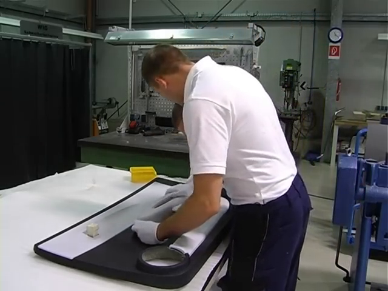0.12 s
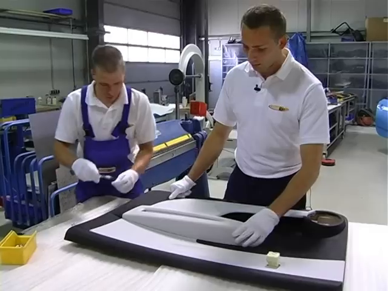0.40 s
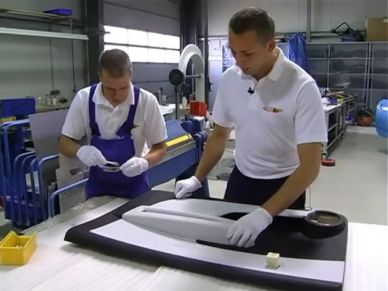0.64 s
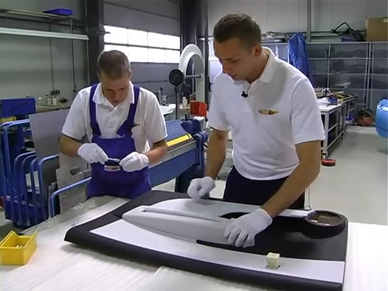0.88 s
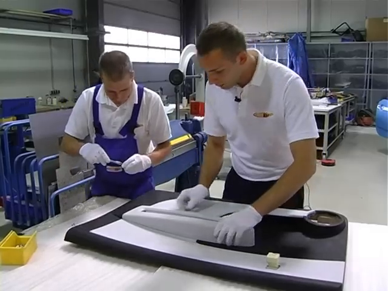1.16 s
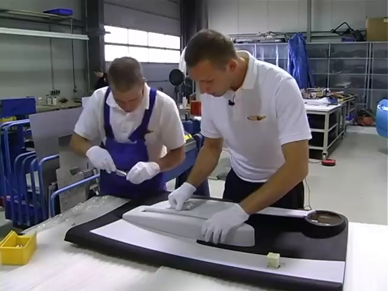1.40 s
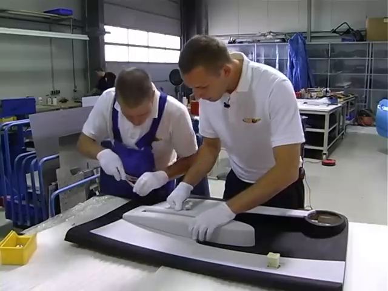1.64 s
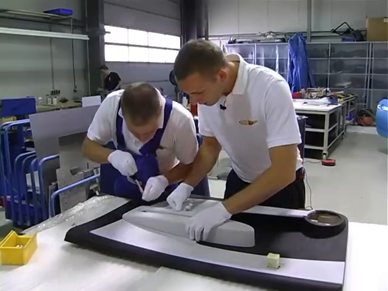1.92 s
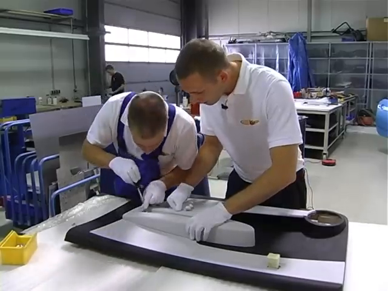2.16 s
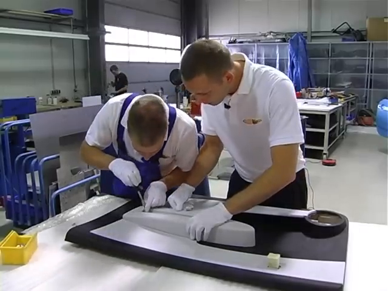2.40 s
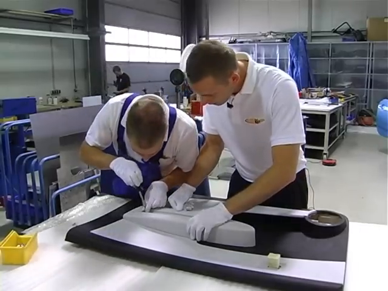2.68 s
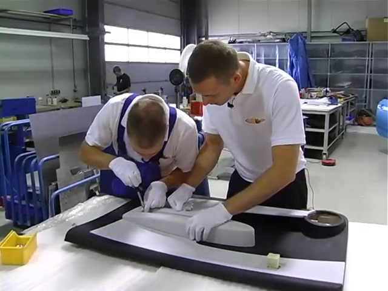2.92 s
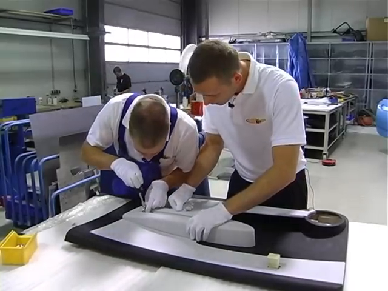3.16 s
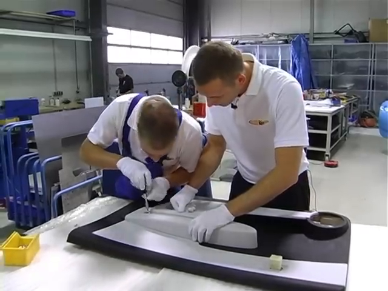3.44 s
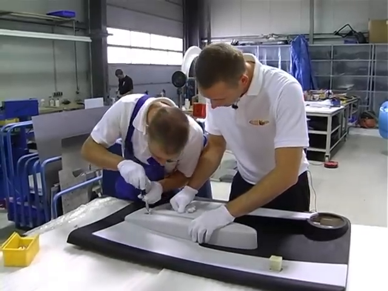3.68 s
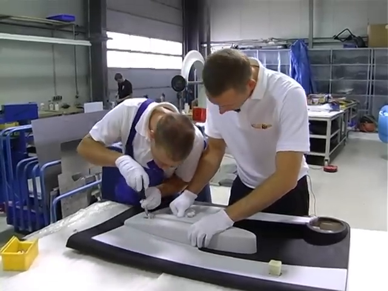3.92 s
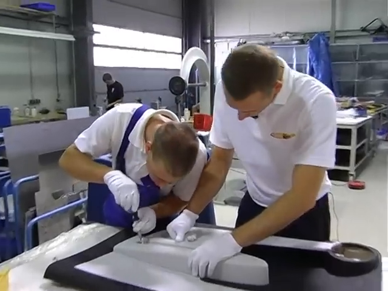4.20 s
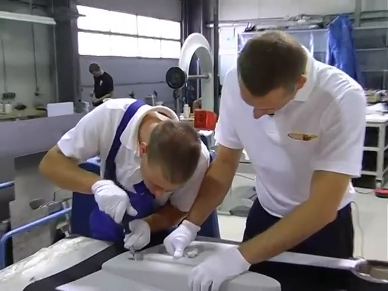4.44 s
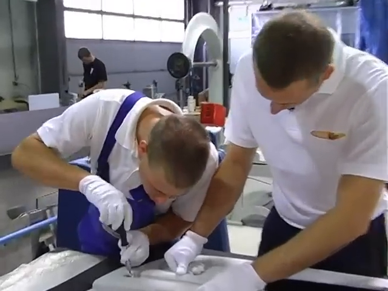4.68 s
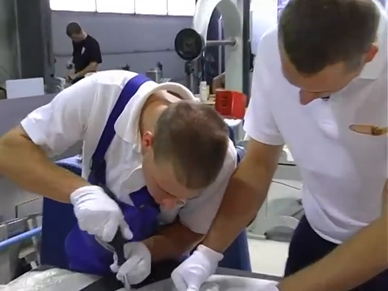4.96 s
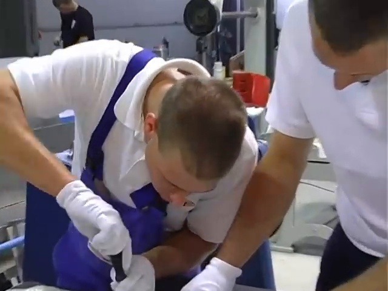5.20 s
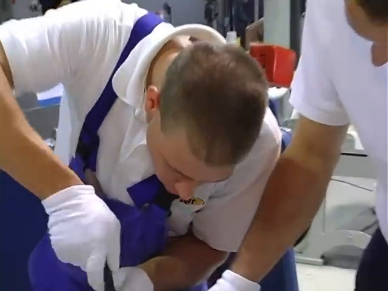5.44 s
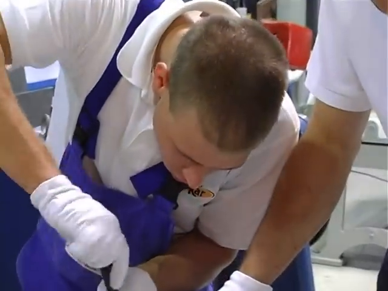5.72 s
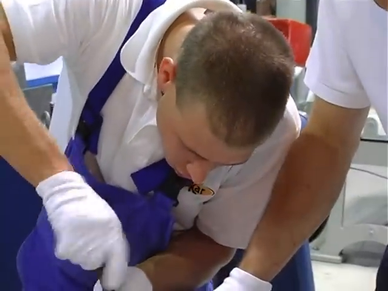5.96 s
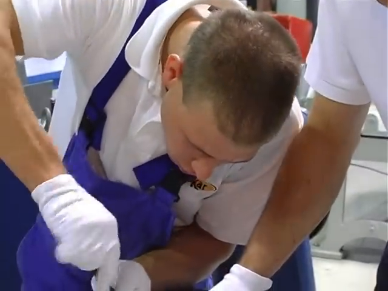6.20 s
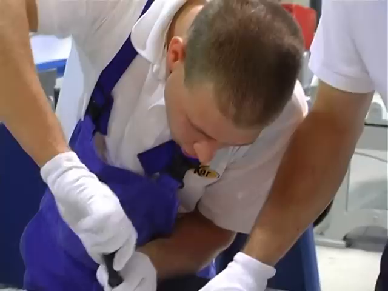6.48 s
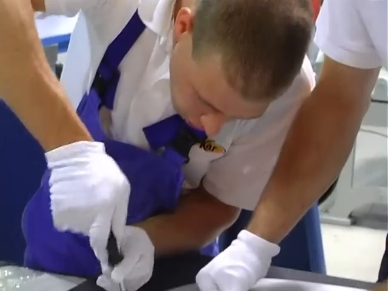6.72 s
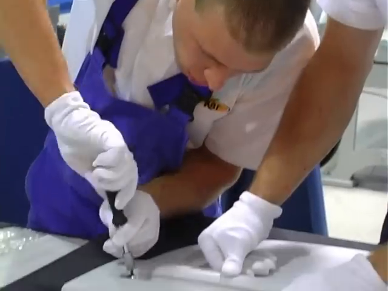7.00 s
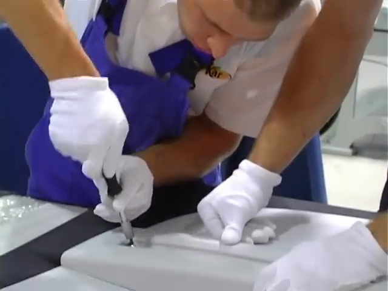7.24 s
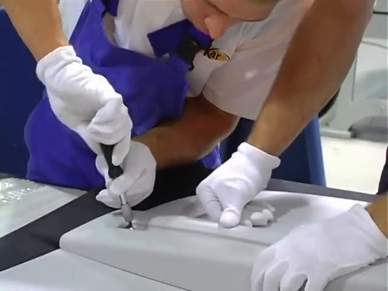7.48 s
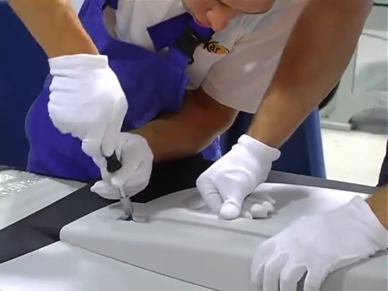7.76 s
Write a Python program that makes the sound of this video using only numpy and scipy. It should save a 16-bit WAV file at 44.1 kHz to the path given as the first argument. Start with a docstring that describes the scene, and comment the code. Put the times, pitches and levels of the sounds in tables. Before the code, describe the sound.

In a large workshop, gloved hands and a screwdriver click, knock and rub on a hollow plastic panel near one microphone. Quick clicks open it, then a quiet gap, then scattered knocks. A distant air nozzle hisses in long fluttering bursts through the middle and fades, leaving denser knocks and rubbing. Machines and ventilation rumble faintly below.

```python
"""A distant air nozzle hisses in long uneven bursts: bands of noise that follow its flow and aim, smeared by a hall.
Near the single microphone, gloved hands and a screwdriver knock and rub a hollow plastic door panel: clicks ring its modes.
Gloves sweep a table as shaped noise; machines, ventilation and a later compressor rumble below as wavering noise.
Faint far hiss, with the bright hall tail of a clank, is high-passed noise in soft-edged strokes.
A hum filter cuts a comb of thin notches, and a faint line whistle, one steady sine, sits on top."""
import sys
import numpy as np
from scipy import signal
from scipy.fft import rfft, irfft, next_fast_len
from scipy.io import wavfile

SR = 44100
rng = np.random.default_rng(int(sys.argv[2]) if len(sys.argv) > 2 else 0)


def store_pcm(level_fs):
    """Save levels as 16-bit WAV."""
    pcm = np.round(np.clip(level_fs, -1, 1) * 32767).astype(np.int16)
    wavfile.write(sys.argv[1], SR, np.atleast_2d(pcm).T)


def boost(x):
    """Linear amplitude factor 10**(x/20) for a level x in decibels (scalar or array-like)."""
    u = np.asarray(x, float) / 20
    return 10 ** u


N = 347067
PADDED = next_fast_len(N)

# The jet; positive aim brightens it, roar is relative to flow as the jet strikes a surface:
# (time [s], flow [dB], aim [dB], roar [dB])
JET_COURSE = [(3.21, -105, 0, 6), (3.28, -57, -5, -28), (3.33, -59.5, -10.5, -19), (3.5, -68, -7, 1),
              (3.64, -49, -3, -14), (3.77, -42.5, 1.5, -15), (3.87, -46.5, -3, -11.5),
              (4.02, -41.5, -3, -18), (4.3, -39, -7, -18.5), (4.46, -42, -4.5, -15), (4.7, -53, -2.5, -6),
              (4.87, -47, 4.5, -12.5), (5.03, -49, 2, -11), (5.12, -46, 3.5, -9.5), (5.26, -50, 5, -7),
              (5.36, -45.5, 3, -10.5), (5.6, -51, 1.5, -4.5), (5.66, -49, 3, -2.5), (5.73, -50, 0.5, -5),
              (5.85, -47, -3, -5.5), (5.97, -52.5, 2, 5), (6.07, -48.5, 1.5, -6.5), (6.2, -51, 0.5, -1),
              (6.56, -51.5, -0.5, 2), (6.75, -65, 0, 8.5), (6.81, -53.5, -1.5, 4), (6.92, -55, -1.5, 8),
              (7.1, -74.5, -8, 18.5), (7.55, -98.5, -8, 25.5), (7.75, -115, -10, 29)]
# Spectrum of the jet and the far hiss: (frequency [Hz], level [dB per Hz])
HISS_COLOUR = [(1290, 2), (2200, -7.5), (2430, -10), (3150, -7.5), (4060, -7.5), (4590, -3.5), (5720, -3),
               (6790, -4.5), (8200, -3), (11400, -4), (15500, -8)]
# Blows on the panel: (time [s], ring [dB], hollowness [dB], hardness [dB])
PANEL_BLOWS = [(0.082, -53, -8, 9), (0.095, -44, -16, -18), (0.108, -50, -3, 0), (0.146, -64, -8, 13),
               (0.165, -50, -11, 9.5), (0.175, -43, -16, 11), (0.214, -49.5, -24, 4), (0.231, -58, -13, 13),
               (0.284, -38, -20, 0), (0.459, -47.5, -8, 0.5), (1.553, -62.5, 14, -12), (1.689, -63, 8, -12),
               (1.782, -67, 0, -10), (1.948, -46, 1.5, 7.5), (2.349, -44.5, 5, -11), (2.398, -49, 0, -22),
               (2.449, -39, 3, -16), (2.47, -41, 3.5, -15), (2.588, -38.5, 3, -16), (2.717, -58.5, 5, 4),
               (2.733, -40.5, -10, -8.5), (2.958, -54, 1, -9), (3.019, -36.5, -1, -21),
               (3.092, -51, 1, -12), (3.123, -38.5, -6, -3), (3.142, -31.5, 3, -14.5), (3.972, -45, -7, -8),
               (4.013, -47, -1, -14), (4.713, -36.5, -9, -10), (4.863, -42.5, -9, -20),
               (5.214, -42.5, -25, -4.5), (5.347, -46, -6, -16), (5.394, -48.5, -4, -2.5),
               (5.57, -35.5, -14, -12), (5.661, -35.5, -5, -7.5), (5.786, -41.5, 2.5, -8),
               (5.965, -41, -8, -30), (6.428, -45, 4, -13), (6.905, -32, -13, -19), (6.944, -41, -19, -20),
               (7.1, -28.5, -21, -17), (7.196, -44.5, -9, -20), (7.222, -44, -21, -15),
               (7.343, -39.5, -16, -16), (7.385, -50, -20, -9), (7.484, -51, -3, -7),
               (7.582, -37, -9, -16.5), (7.618, -42.5, -7.5, -20), (7.736, -42, -20, -14),
               (7.841, -41.5, -2, -14.5), (7.859, -55, 10, 8)]
# Resonances of the door panel: (frequency [Hz], level [dB], t60 [s])
PANEL_MODES = [(246, -5.5, 0.044), (274.2, -5, 0.086), (326, 4, 0.03), (495, 0.5, 0.038),
               (547.7, -1.5, 0.035), (713, -5, 0.068), (836, -0.5, 0.024), (1092, -8, 0.028),
               (1266, 10.5, 0.0067), (1444, 7, 0.0067), (1770, -18, 0.032)]
# Family of each panel mode: (0 ring, 1 thud, 2 upper ring, 3 clack)
MODE_FAMILY = [1, 1, 1, 0, 0, 2, 2, 3, 3, 3, 3]
# Effort of the hall's machines: (time [s], level [dB])
MACHINE_EFFORT = [(0.0, -62), (0.7, -70.5), (1.28, -69.5), (1.52, -66.5), (1.88, -66.5), (2.3, -75.5),
                  (3.4, -71.5), (3.8, -62.5), (4.4, -68.5), (5.2, -62), (5.8, -60), (6.45, -56),
                  (6.9, -61.5), (7.15, -58), (7.6, -64.5), (7.87, -58)]


def at_hz(points, hz):
    """Read a spectrum on a log-frequency axis."""
    point_hz, values = np.transpose(points)
    return np.interp(np.log(hz), np.log(point_hz), values)


def in_time(rows):
    """Draw the columns of a table as sample-rate curves."""
    s, *columns = np.transpose(rows)
    return [np.interp(np.arange(N) / SR, s, c) for c in columns]


def rms_one(x):
    """Scale to unit rms."""
    return x / np.sqrt(np.mean(x ** 2) + 1e-20)


def coloured(spectrum, low_hz=10, high_hz=22000):
    """Shape white noise to a spectrum between two soft edges; rms 1."""
    hz = np.linspace(1, SR / 2, PADDED // 2 + 1)
    edges = 1 / np.sqrt((1 + (low_hz / hz) ** 8) * (1 + (hz / high_hz) ** 8))
    white = rfft(rng.standard_normal(PADDED))
    return rms_one(irfft(white * boost(at_hz(spectrum, hz)) * edges, PADDED)[:N])


def drift(corner_hz):
    """Slow chance: noise twice through a one-pole low-pass; spread 1."""
    step = 40  # samples between the points of the slow curve
    r = np.exp(-2 * np.pi * corner_hz * step / SR)
    noise = rng.standard_normal(N // step + 2002)
    slow = signal.lfilter([1], [1, -2 * r, r * r], noise)[2000:]  # skip the filter's start
    return np.interp(np.arange(N) / step, np.arange(len(slow)), rms_one(slow))


def strokes(rows, rise_db_per_s, fall_db_per_s):
    """Gain of held strokes (time [s], length [s], level [dB]), each rising to its start and fading after its end."""
    t = np.arange(N) / SR
    gain = 0
    for s, length, db in rows:
        rise = rise_db_per_s * np.maximum(s - t, 0)
        fall = fall_db_per_s * np.maximum(t - s - length, 0)
        gain = gain + boost(db - rise - fall)
    return gain


def ring(clicks, hz, t60):
    """A unit click sets a sine of height 1 ringing and dying away."""
    r = boost(-60 / (max(t60, .002) * SR))
    w = 2 * np.pi * hz / SR
    return signal.lfilter([0, np.sin(w)], [1, -2 * r * np.cos(w), r * r], clicks)


def panel_mode(clicks, hz, t60, swell_cycles=13.6, longest_s=0.047):
    """Padded contact rings briefly at the mode's pitch and drives the mode, so that it swells before it decays."""
    swell = min(swell_cycles / hz, longest_s)  # t60 of the contact [s]
    contact = ring(clicks, hz, swell)
    return ring(contact, hz, t60) * 2 * np.log(1000) / (swell * SR)


def machines():
    """Far machines: coloured noise follows their effort and wavers in level."""
    # Machine spectrum: (frequency [Hz], level [dB per Hz])
    machine_colour = [(120, -15.5), (170, -2), (240, -1), (330, -2), (480, 2), (650, -6), (1100, -13.5),
                      (2000, -77)]
    effort_db, = in_time(MACHINE_EFFORT)
    return boost(effort_db + 2.56 * drift(10.4)) * coloured(machine_colour)


def rumble():
    """Ventilation, a compressor that cuts in and table thumps under hollow blows drive one wavering low noise."""
    # Low rumble spectrum: (frequency [Hz], level [dB per Hz])
    rumble_colour = [(15, -40), (32, -11), (60, -10), (78, 0), (95, -1.5), (118, -1.5), (145, -18.5),
                     (220, -34), (400, -71)]
    vent_db, vent_follows = -72.5, 0.27  # share of the machines' dB swing that the ventilation follows
    compressor_db, compressor_on_s, run_up_s = -67, 4.55, 0.13
    thump_db, thump_fade_db_per_s = -32.5, 166

    effort_db, = in_time(MACHINE_EFFORT)
    ventilation = boost(vent_db + vent_follows * (effort_db - effort_db.mean()))
    running = np.clip((np.arange(N) / SR - compressor_on_s) / run_up_s, 0, 1)
    thump_rows = [(s, 0, db + hollow + thump_db) for s, db, hollow, _ in PANEL_BLOWS]
    thumps = strokes(thump_rows, rise_db_per_s=3000, fall_db_per_s=thump_fade_db_per_s)
    gain = ventilation + running * boost(compressor_db) + thumps
    return gain * boost(2.0 * drift(6.8)) * coloured(rumble_colour)


def far_hiss():
    """Faint far hiss: soft swells, and the bright hall tail of a clank at 1.95 s, all strokes of high-passed noise."""
    # Swells and the clank's tail: (time [s], length [s], level [dB])
    swells = [(0.0, 0.098, -70.5), (0.2, 0.38, -79.5), (0.3, 0.037, -80), (0.8, 0.94, -77.5),
              (1.95, 0.043, -74.5)]
    return strokes(swells, rise_db_per_s=302, fall_db_per_s=133) * coloured(HISS_COLOUR, low_hz=4240)


def sweeps_and_roar():
    """Sweeping gloves, an unbroken far rustle and the jet's low roar share one wavering mid-range noise."""
    # Gloves sweeping the table: (time [s], length [s], level [dB])
    sweeps = [(0.0, 0.03, -70), (0.45, 0.08, -69.5), (0.7, 0.97, -87), (1.8, 0.28, -78.5),
              (2.4, 0.25, -83.5), (7.57, 0.3, -82)]
    # Spectrum of sweep and roar: (frequency [Hz], level [dB per Hz])
    sweep_colour = [(400, -17.5), (650, -6.5), (1000, -4.5), (1500, -6.5), (2000, -10), (3000, -15.5),
                    (5000, -34)]
    rustle_db = -83.5
    flow_db, _, roar_db = in_time(JET_COURSE)
    roar = boost(flow_db + roar_db)
    gain = roar + strokes(sweeps, rise_db_per_s=98, fall_db_per_s=66) + boost(rustle_db)
    return gain * boost(1.0 * drift(5.9)) * coloured(sweep_colour)


def rubbing(slips_per_s=500):
    """Gloves and tool rub the panel: dense uneven slips excite its ring and clack modes."""
    # Rubs, the clack relative to the ring: (time [s], length [s], ring [dB], clack [dB])
    rubs = [(0.0, 0.043, -68.5, 14.5), (0.304, 0.058, -62, -31), (0.465, 0.051, -70, 4),
            (7.17, 0.1, -63, -16), (7.34, 0.11, -64, -8), (7.55, 0.3, -74, -2)]
    slips = (rng.random(N) < slips_per_s / SR) * rng.standard_normal(N) + 1e-18

    def rubbed(family):
        """Sum one family of modes under the slips; rms 1."""
        total = np.zeros(N)
        for (hz, db, t60), mode_family in zip(PANEL_MODES, MODE_FAMILY):
            if mode_family == family:
                total += panel_mode(slips, hz, t60) * boost(db)
        return rms_one(total)

    ringing, clacking = rubbed(0), rubbed(3)
    out = np.zeros(N)
    for s, length, db, clack_db in rubs:
        gain = strokes([(s, length, db)], rise_db_per_s=400, fall_db_per_s=111)
        out += gain * (ringing + boost(clack_db) * clacking)
    return out


def panel_knocks():
    """Each blow and its bounce ring every panel mode, family by family, and add a sharp tick of decaying noise."""
    upper_db, upper_per_hardness, upper_per_hollowness = -1, 0.37, 0.16  # upper ring relative to the ring
    tick_db, tick_decay_s = -14.5, 0.0048  # tick relative to the clack
    lead_s = .001  # contact begins just before the sound has swelled

    s, ring_db, hollow, hard = np.transpose(PANEL_BLOWS)
    at = np.round((s - lead_s) * SR).astype(int)
    upper = upper_db + upper_per_hardness * hard + upper_per_hollowness * hollow
    family_db = ring_db + np.array([np.zeros(len(s)), hollow, upper, hard])  # one row a family
    luck = rng.standard_normal((len(s), len(PANEL_MODES)))
    bounce_cycles = rng.uniform(2.316, 5.57, (len(s), len(PANEL_MODES)))

    out = np.zeros(N)
    for k, (hz, level_db, t60) in enumerate(PANEL_MODES):
        size = boost(family_db[MODE_FAMILY[k]] + level_db + 2.6 * luck[:, k])
        clicks = np.full(N, 1e-18)
        clicks[at] = size
        bounce_at = at + (bounce_cycles[:, k] / hz * SR).astype(int)
        clicks[np.minimum(bounce_at, N - 1)] += 0.6 * size
        out += panel_mode(clicks, hz, t60)

    ticks = np.full(N, 1e-18)
    ticks[at + round(lead_s * SR)] = boost(family_db[3] + tick_db)
    tick_gain = signal.lfilter([1], [1, -np.exp(-1 / (tick_decay_s * SR))], ticks)
    # tick spectrum: (frequency [Hz], level [dB per Hz])
    return out + tick_gain * coloured([(1200, 8), (2500, 4.5), (8000, 1.5), (14000, -37)])


def jet():
    """Turbulent hiss: the nozzle's aim shifts weight between lower part, core and sheen; eddies make it flutter."""
    lower_db, lower_per_aim, lower_per_roar = -4, -0.65, 0.41  # sinks as the jet points this way, grows with roar
    flow_db, aim_db, roar_db = in_time(JET_COURSE)
    flow_db = flow_db + 0.48 * drift(6.4)
    weight_db = lower_db + lower_per_aim * aim_db + lower_per_roar * roar_db
    lower = boost(weight_db + 1.0 * drift(13.0)) * coloured(HISS_COLOUR, low_hz=2590, high_hz=5250)
    core = boost(-2.07) * coloured(HISS_COLOUR, low_hz=5340, high_hz=10450)
    sheen = boost(aim_db) * coloured(HISS_COLOUR, low_hz=9300)
    return boost(flow_db) * (lower + core + sheen)


def hall(x):
    """Diffuse tail: noise that dies octave by octave, the treble first; unit energy."""
    # Decay time of the hall: (frequency [Hz], t60 [s])
    hall_t60 = [(200, 0.57), (1000, 0.87), (4000, 0.45), (12000, 0.12)]
    t = np.arange(int(1.6 * SR)) / SR
    tail = np.zeros(len(t))
    for hz in 125 * 2. ** np.arange(7):
        octave = signal.butter(2, [hz / np.sqrt(2), hz * np.sqrt(2)], "band", fs=SR, output="sos")
        noise = signal.sosfilt(octave, rng.standard_normal(len(t)))
        tail += noise * boost(-60 * t / at_hz(hall_t60, hz))
    tail = tail * np.minimum(t / 0.011, 1)  # the tail builds up over 11 ms
    return signal.fftconvolve(x, tail / np.sqrt(np.sum(tail ** 2)))[:N]


def scene():
    """The far hisses ring in the hall, the near panel is almost dry, all into one microphone."""
    background = machines() + rumble() + sweeps_and_roar()
    hisses = far_hiss() + jet()
    knocks = rubbing() + panel_knocks()
    reverb = hall(boost(-11) * hisses + boost(-22.0) * knocks)
    mono = boost(1.5) * hisses + knocks + background + reverb
    return np.array([mono, mono])


def circuit_hiss():
    """Steady treble-heavy circuit noise, the same in both channels."""
    # Hiss spectrum: (frequency [Hz], level [dB per Hz])
    circuit_colour = [(1410, -34), (2400, -19), (3800, -7.5), (5660, -1.5), (8180, -2.5), (14300, -3),
                      (15000, -10)]
    return boost(-80) * coloured(circuit_colour)


def channel_noise():
    """A little noise of opposite polarity in the two channels, which sets them apart."""
    # Channel noise spectrum: (frequency [Hz], level [dB per Hz])
    noise_colour = [(20, -24), (150, 1.5), (400, -16.5), (1500, -24.5), (4000, -28.5), (6000, -21.5),
                    (15000, -24.5)]
    return boost(-82.5) * coloured(noise_colour) * [[1], [-1]]


def hum_comb(x, spacing_hz=300, half_width_hz=18.0, depth=1.0, odd_depth=0.9, odd_top_hz=5250):
    """Thin notches on hum multiples from the second up; odd ones are shallower and stop in the lower treble."""
    hz = np.linspace(0, SR / 2, PADDED // 2 + 1)
    nearest = np.round(hz / spacing_hz)
    cut = np.where(nearest % 2 == 0, depth, odd_depth * (hz < odd_top_hz)) * (nearest > 1)
    offset = (hz - nearest * spacing_hz) / half_width_hz
    return irfft(rfft(x, PADDED) * (1 - cut / (1 + 1j * offset)), PADDED)[:, :N]


def line_whistle():
    """A faint, very high steady sine."""
    # Whistle tones: (frequency [Hz], level [dB rms])
    tones = [(15622, -78.5)]
    t = np.arange(N) / SR
    return sum(np.sqrt(2) * boost(db) * np.sin(2 * np.pi * hz * t) for hz, db in tones)


def low_pass(x):
    """Removes everything above the highest recorded frequency."""
    return signal.sosfilt(signal.butter(12, 15910, fs=SR, output="sos"), x)


def record(dry):
    """Add circuit hiss and channel noise, cut the hum comb, then add the line whistle."""
    wired = dry + circuit_hiss() + channel_noise()
    mix = hum_comb(wired) + line_whistle()
    return low_pass(mix)


dry = scene()
out = record(dry)
store_pcm(out)
```